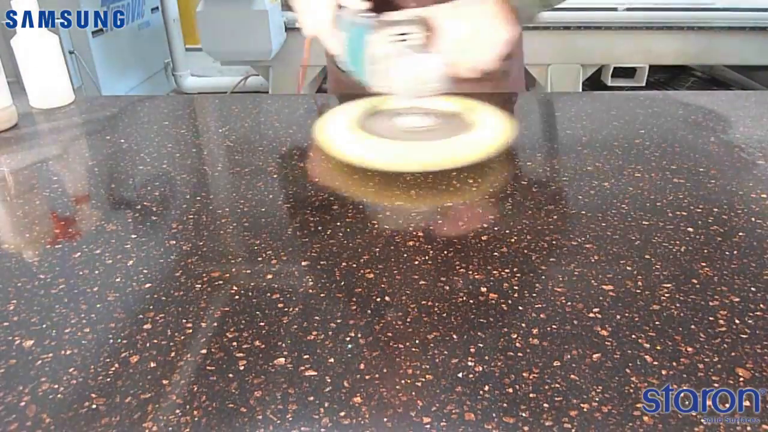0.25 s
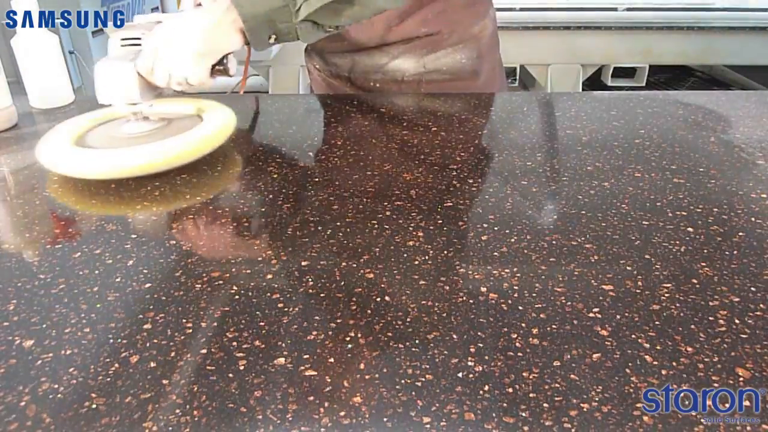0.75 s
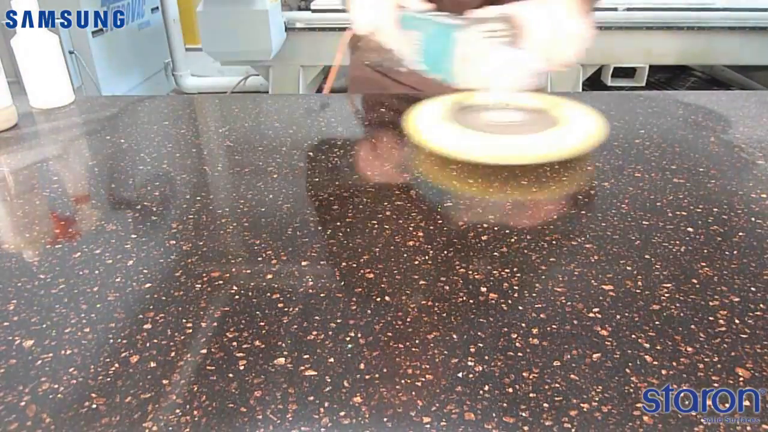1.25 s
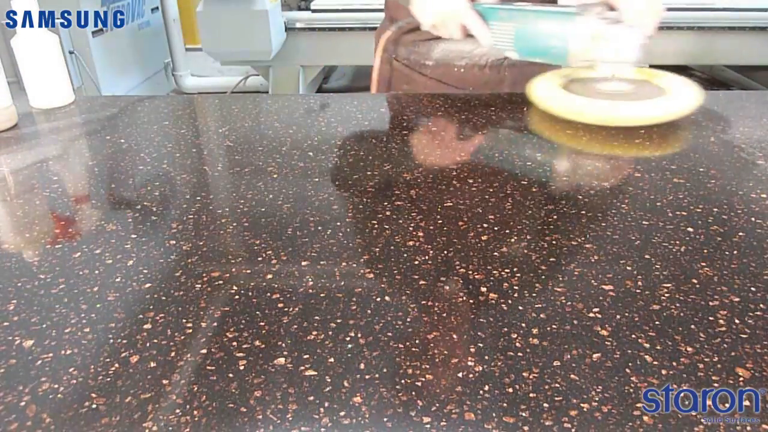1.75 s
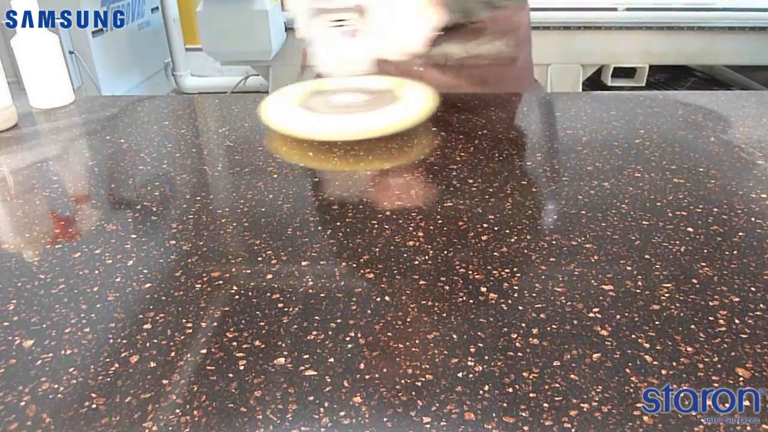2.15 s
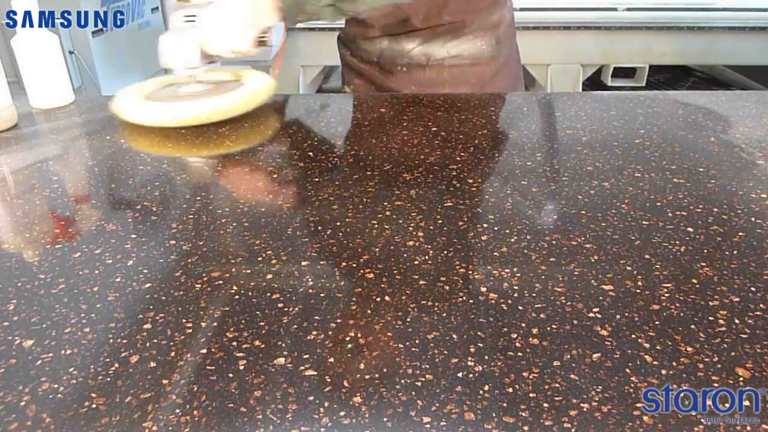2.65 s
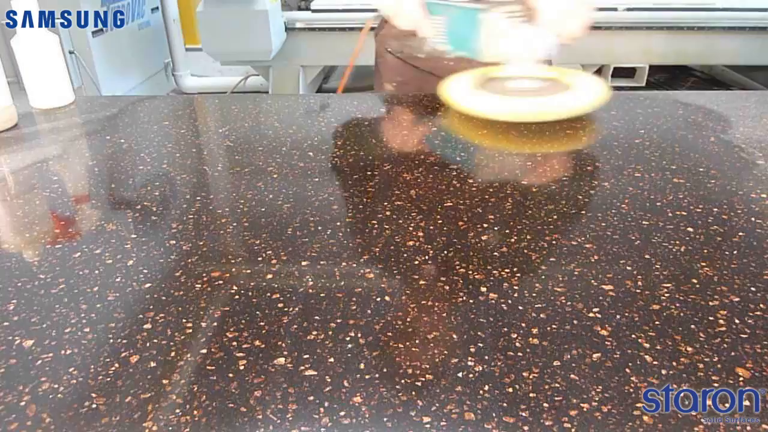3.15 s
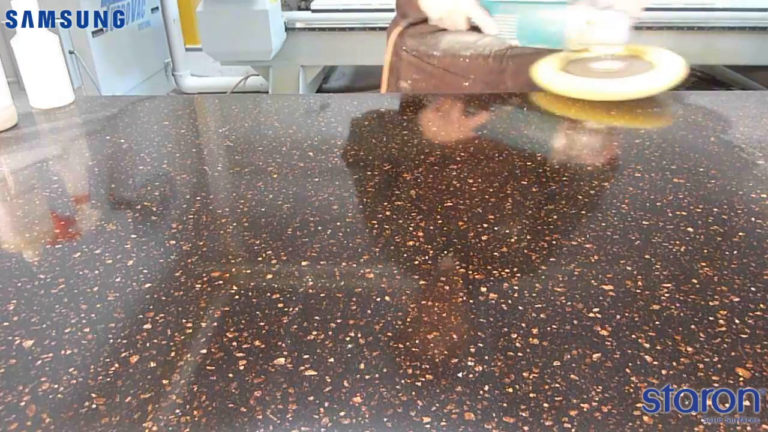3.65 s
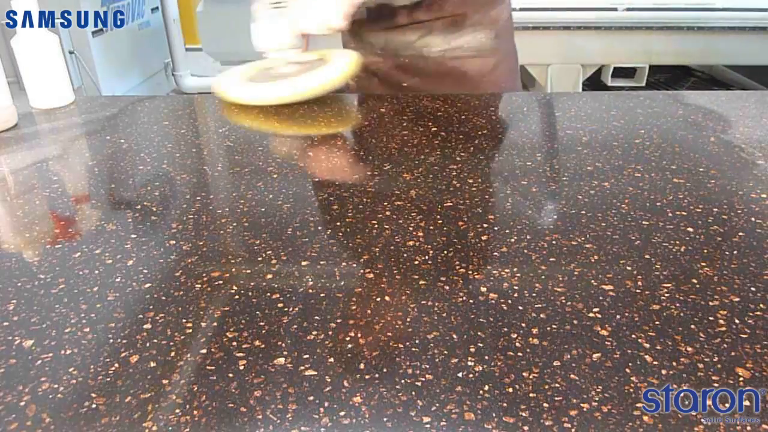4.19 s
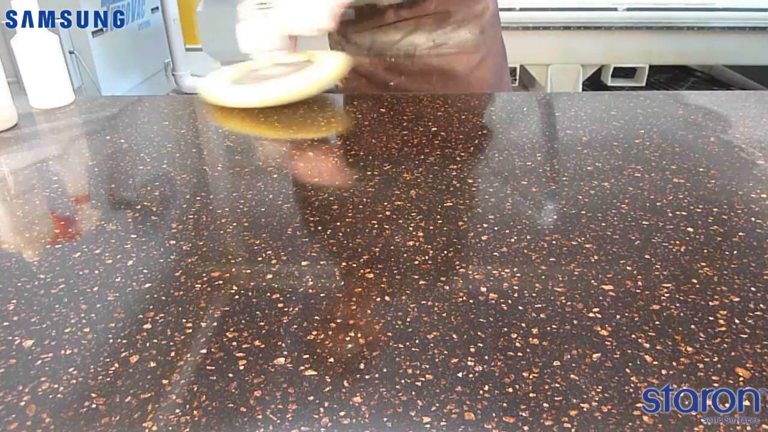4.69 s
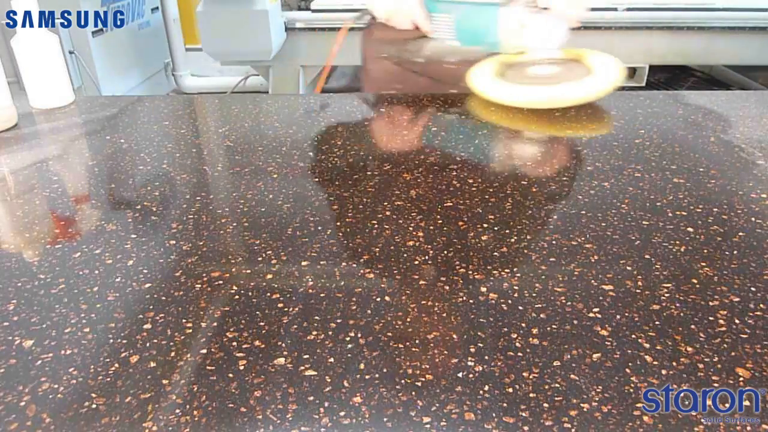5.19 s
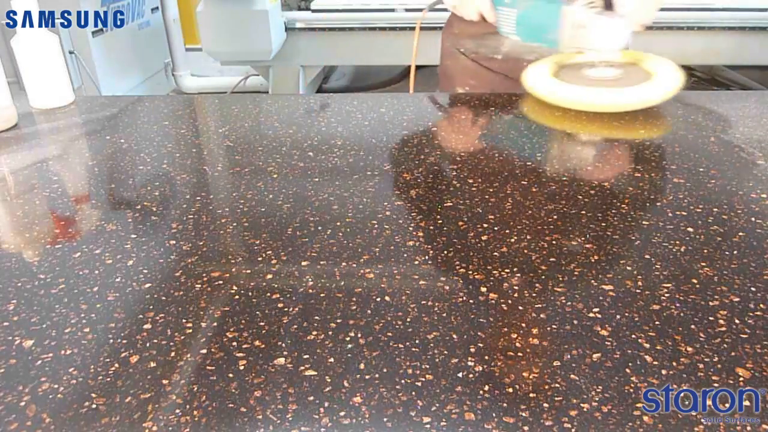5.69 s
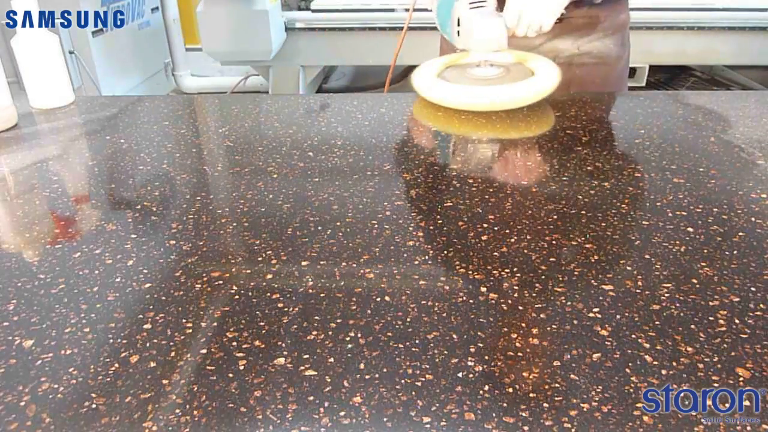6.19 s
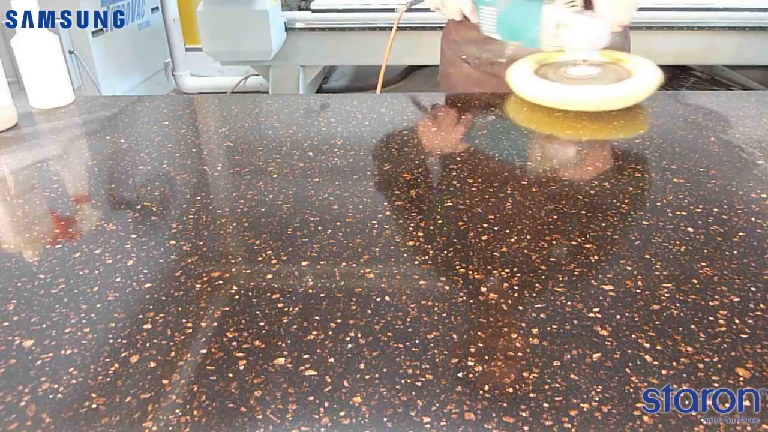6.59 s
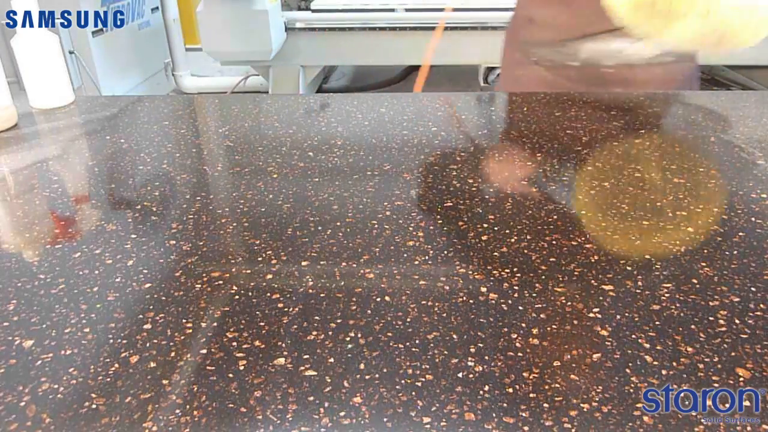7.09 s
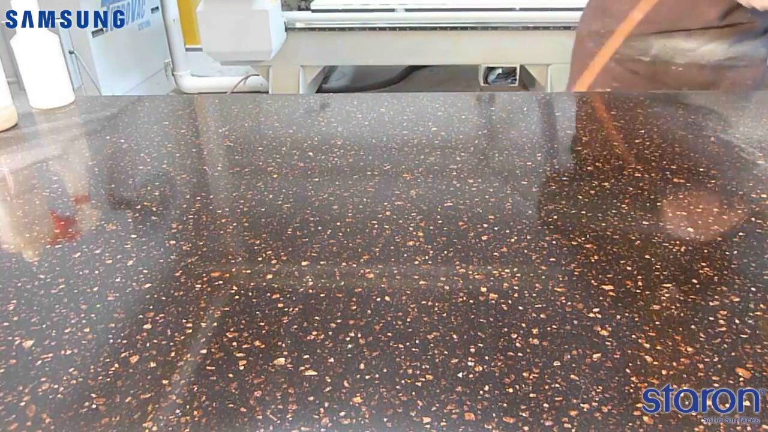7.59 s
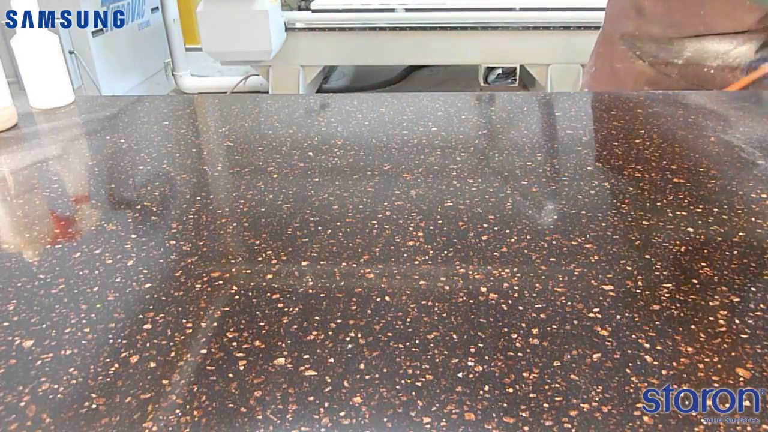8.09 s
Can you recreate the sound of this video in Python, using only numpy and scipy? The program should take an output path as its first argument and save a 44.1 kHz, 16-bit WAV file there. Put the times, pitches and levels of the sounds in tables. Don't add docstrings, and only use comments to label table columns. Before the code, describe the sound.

An electric polisher whines loudly and sweeps over a stone counter, then winds down with rattling gears, leaving a low blower hum and clicks.

```python
import sys
import numpy as np
from scipy import signal
from scipy.fft import rfft, irfft, next_fast_len
from scipy.io import wavfile
from scipy.ndimage import uniform_filter1d, map_coordinates

SR = 44100
rng = np.random.default_rng(int(sys.argv[2]) if len(sys.argv) > 2 else 0)


def gain_from_db(level_db):
    decades = np.asarray(level_db, float) / 20
    return 10 ** decades


def transcribe(signal):
    frames = np.atleast_2d(signal).T
    limited = np.clip(frames, -1, 1)
    pcm = np.round(limited * 32767).astype(np.int16)
    wavfile.write(sys.argv[1], SR, pcm)


N = 367794
T = np.arange(N) / SR
OFF_S, MAINS_HZ = 5.15, 60
PINION, CROWN = 6, 44
LEFT_RIGHT = np.array([[1], [-1]])

# (centre [Hz], width [Hz], gain [dB])
HOUSING = [(1130, 300, -2), (2360, 350, 18.5), (3576, 320, 14), (4690, 610, 15), (5600, 1000, 2)]
# (time [s], beat depth [0-1], rotor wobble [rad])
PLAY = [
    (5.15, .3, .03),
    (5.25, .8, .11),
    (5.42, 0.7, .11),
    (5.55, 0.3, 0.08),
    (5.65, .51, 0.046),
    (5.8, 0.2, .06),
    (5.95, 0.4, 0.047),
    (6.2, 0.4, 0.021),
    (6.5, 0.2, .02),
    (6.9, 0, 0.013),
]
# (time [s], level [dB])
PRESSURE = [
    (0, -59.5),
    (2.4, -64),
    (3.0, -56),
    (4.54, -44),
    (5.05, -50),
    (5.4, -54),
    (5.6, -47),
    (5.75, -60),
    (6.0, -59),
    (7.0, -69),
]


def curves(table):
    s, *columns = np.transpose(table)
    return [np.interp(T, s, c) for c in columns]


def unit(x):
    return x / np.sqrt(np.mean(np.abs(x) ** 2))


def colour(x, spectrum, modes=()):
    hz = np.arange(len(x) // 2 + 1) * SR / len(x) + 1
    outline_hz, outline_db = np.transpose(spectrum)
    db = np.interp(np.log(hz), np.log(outline_hz), outline_db)
    for centre_hz, width_hz, top_db in modes:
        db = db + top_db / (1 + (2 * (hz - centre_hz) / width_hz) ** 2)
    return irfft(gain_from_db(db) * rfft(x), len(x))


def noise(spectrum, modes=(), size=N):
    return unit(colour(rng.standard_normal(size), spectrum, modes))


def walk(rate_hz):
    k = max(int(SR / rate_hz), 2)
    held = np.repeat(rng.standard_normal(N // k + 1), k)
    return unit(uniform_filter1d(uniform_filter1d(held, k), k)[:N])


def patchy(spectrum, depth_db, rate_hz):
    size = next_fast_len(N)
    x = rfft(noise(spectrum, size=size))
    octave = np.log2(np.arange(len(x)) * SR / size + 1)
    out = 0
    for third in range(29, 40):
        band = irfft(x * np.clip(1 - 3 * np.abs(octave - third / 3), 0, 1), size)[:N]
        out = out + gain_from_db(depth_db * walk(rate_hz)) * band
    return out


def swells(table):
    spread_s = 0.045
    coarse = T[::64]
    bells = sum(gain_from_db(db) * np.exp(-.5 * ((coarse - s) / spread_s) ** 2) for s, db in table)
    return np.interp(T, coarse, bells)


def sweep():
    # (time [s], left minus right [dB])
    turning_points = [
        (0, -3),
        (0.781, 6.5),
        (1.62, -3.5),
        (2.6, 4.5),
        (3.62, -3.5),
        (4.54, 5),
        (5.48, -3),
        (6.1, -1),
        (7.0, -1),
    ]
    s, pan_db = np.transpose(turning_points)
    index = np.arange(len(s))
    stroke = np.interp(T, s, index)
    eased = np.floor(stroke) + .5 - .5 * np.cos(np.pi * (stroke % 1))
    return np.interp(eased, index, pan_db), np.sin(np.pi * (stroke % 1)) * (T < OFF_S)


def relative_pace():
    return uniform_filter1d(sweep()[1], SR // 5) - .6


def rotor():
    # (time [s], speed [turns/s])
    driven_speed = [(0, 250.5), (.6, 251), (.68, 253.5), (.88, 263.8), (1.0, 265.8), (1.25, 269),
                    (1.5, 269.1), (1.7, 272.8), (1.95, 272.8), (2.15, 271.3), (2.5, 272), (2.7, 274.3),
                    (2.95, 272.9), (3.4, 273.7), (3.65, 276.3), (3.95, 274.3), (4.4, 274.8), (4.6, 276.3),
                    (4.85, 274.5), (5.1, 275.9)]
    # (time [s], speed [turns/s])
    coasting_speed = [
        (5.17, 275),
        (5.25, 256.5),
        (5.4, 235.5),
        (5.55, 212.1),
        (5.75, 185.7),
        (6.25, 106.8),
        (6.42, 83.5),
        (6.6, 56),
        (6.881, 14),
        (7.1, 1.2),
    ]
    speed = curves(driven_speed + coasting_speed)[0]
    turns = np.cumsum(speed) / SR
    spindle = (turns - turns[int(OFF_S * SR)]) * PINION / CROWN
    power = np.clip((OFF_S - T) / 0.01, 0, 1)
    return speed, turns, spindle, power


def pad_load(power):
    return power * np.clip((T - 1.0) / 0.59, 0, 1)


def sag(speed, slope_db, knee):
    full_speed = 275.
    return slope_db * np.log2((speed + knee) / (full_speed + knee))


def hiss_level_db(speed):
    return -36 + sag(speed, 7.5, 14) + 2 * relative_pace()


def tooth_errors(spindle, renew_hz):
    field = rng.standard_normal((2, 100, CROWN))
    harmonic = np.arange(CROWN // 2 + 1)
    field = irfft(rfft(field) * (harmonic > 0) / (1 + (harmonic / 3.17) ** 2), CROWN)
    where = [T * renew_hz, spindle % 1 * CROWN]
    re, im = (map_coordinates(f, where, order=1, mode="grid-wrap") for f in field)
    return unit(re + 1j * im)


def rings_db(hz):
    # (centre [Hz], width [Hz], gain [dB])
    housing_rings = [(495, 110, 15), (1327, 430, 13), (1980, 320, 10.5), (2330, 190, 14), (2950, 610, 12),
                     (3640, 400, 11.5), (4700, 720, 19.5)]
    grid_hz = np.arange(0, 12000, 10.)
    gain_db = sum(db / (1 + (2 * (grid_hz - centre) / width_hz) ** 2) for centre, width_hz, db in housing_rings)
    return np.interp(hz, grid_hz, gain_db)


def whine_db(speed, power):
    # (multiple of rotor speed, driven [dB], load gain [dB], coasting [dB], loss per halving of speed [dB])
    main_lines = [
        (6, -44, 2, -42, 10.5),
        (8.96, -43.5, 2, -52.5, 11),
        (11.9, -36.5, 1, -41.5, 9.5),
        (18.2, -45.5, -3.5, -52.5, 6.5),
        (23.7, -46.5, -8, -51.5, 8),
    ]
    # (time [s], multiple of rotor speed, level [dB])
    further_swells = [(5.9, 9, -43), (5.72, 6, -31), (5.63, 12, -34), (5.92, 12, -34), (6.05, 18, -37),
                      (.4, 24, -40), (5.66, 24, -35), (5.1, 12, -47), (5.93, 6, -39), (6.4, 6, -41),
                      (6.5, 6, -50), (5.9, 9, -43), (6.21, 12, -43), (6.36, 12, -45), (6.06, 12, -40),
                      (5.5, 24, -41), (6.28, 24, -53), (5.3, 18, -42), (4.9, 12, -38)]
    # (time [s], level [dB])
    mesh_swells = [(0.01, -32.5), (0.1, -39), (0.16, -46.5), (0.24, -33), (0.39, -34), (0.57, -32.5),
                   (0.64, -37), (0.93, -47.5), (1.02, -30.5), (1.14, -47), (1.21, -31), (1.39, -45),
                   (1.48, -48), (1.56, -37.5), (2.01, -31.5), (2.23, -45), (2.3, -41.5), (2.38, -33.5),
                   (2.73, -33), (2.82, -30.0), (2.92, -28.5), (3.1, -44.5), (3.19, -28.5), (3.28, -39),
                   (3.42, -36), (3.51, -31.5), (3.63, -33.5), (3.77, -40), (3.89, -37.5), (4.04, -37.5),
                   (4.14, -39.0), (4.25, -34), (4.46, -40), (4.53, -29.5), (4.9, -32.5), (4.99, -39),
                   (5.13, -39)]
    # (time [s], level [dB])
    blade_swells = [(0.0, -35), (0.31, -44.5), (0.47, -43), (0.75, -45.0), (0.94, -41), (1.23, -39.0),
                    (1.4, -44), (1.51, -46.5), (1.57, -41.5), (1.88, -42), (2.08, -36), (2.22, -41),
                    (2.35, -30), (2.5, -36.5), (2.59, -40.5), (2.7, -38.5), (2.94, -40), (3.13, -41),
                    (3.28, -47), (3.47, -39), (3.68, -40.5), (3.87, -37), (4.0, -33.5), (4.13, -47.5),
                    (4.24, -33.5), (4.36, -43), (4.44, -33), (4.6, -47), (4.68, -33.5), (4.79, -30.5),
                    (4.92, -43), (5.06, -38), (5.14, -50)]
    # (time [s], level [dB])
    slot_swells = [(0.0, -38), (0.15, -39), (0.32, -38.5), (0.53, -33.5), (0.67, -27.5), (0.75, -30.5),
                   (0.82, -29.5), (0.88, -39.5), (0.94, -30.5), (1.02, -32.5), (1.12, -32.0), (1.21, -40.5),
                   (1.47, -29.5), (1.71, -42), (1.91, -36.5), (2.17, -37), (2.27, -28), (2.38, -38),
                   (2.49, -31), (2.68, -37), (2.79, -36.5), (2.849, -37), (2.96, -31), (3.07, -43),
                   (3.51, -35.0), (4.09, -33.5), (4.198, -30.5), (4.35, -31), (4.58, -32), (4.68, -32),
                   (4.81, -42), (4.89, -30.5)]
    # (time [s], level [dB])
    third_swells = [(0.0, -49.0), (0.06, -32.0), (0.13, -51.0), (0.24, -38), (0.36, -33), (0.45, -40.5),
                    (0.53, -43), (0.69, -40), (0.81, -41.5), (0.95, -32.5), (1.01, -47.0), (1.09, -36.0),
                    (1.29, -34), (1.38, -36), (1.5, -31), (1.64, -36), (1.73, -38.5), (1.86, -32.5),
                    (2.01, -50.5), (2.09, -49.5), (2.2, -41.5), (2.28, -41), (2.429, -39.5), (2.62, -48),
                    (2.9, -48), (2.98, -37.5), (3.06, -42.0), (3.13, -40), (3.25, -43), (3.65, -35.5),
                    (4.27, -45.5), (4.44, -46), (4.88, -37)]
    load = np.clip((T - .3) / 4.7, 0, 1)
    own_swells = (mesh_swells, blade_swells, slot_swells, third_swells, [])
    out = []
    for (order, driven_db, load_db, coast_db, slope_db), own in zip(main_lines, own_swells):
        further = [(s, db) for s, k, db in further_swells if round(k) == round(order)]
        swell = swells(list(own) + further)
        driven = gain_from_db(driven_db + load_db * load + walk(12))
        free = gain_from_db(coast_db + rings_db(order * speed) + sag(speed, slope_db, 12.0))
        out.append(20 * np.log10(power * driven + (1 - power) * free + swell))
    return out


def slot_ripple(turns, power):
    # (time [s], level [dB])
    above_swells = [(0.01, -33.5), (0.111, -34), (0.24, -42), (0.59, -39), (0.69, -43.5), (1.41, -37),
                    (1.54, -45), (1.63, -38.0), (1.739, -38.5), (1.92, -40.5), (2.01, -44), (2.55, -39),
                    (2.68, -43.5), (2.82, -45), (3.04, -39), (3.21, -47), (3.31, -39), (3.5, -36),
                    (3.6, -42), (3.72, -36), (4.51, -36.5), (4.62, -47.0)]
    # (time [s], level [dB])
    below_swells = [(0.0, -38), (0.36, -34), (0.69, -42), (0.77, -41), (0.89, -35.5), (1.11, -39),
                    (1.38, -42.0), (1.49, -38.5), (1.62, -34), (1.73, -33.5), (1.87, -34), (2.21, -41),
                    (2.32, -38.5), (2.51, -39.5), (2.64, -37.5), (3.06, -39.0), (3.38, -38), (3.52, -33.5),
                    (3.69, -36), (4.32, -40.0), (4.73, -40.0), (4.92, -43)]
    ripple = np.exp(2j * np.pi * 2 * MAINS_HZ * T)
    out = 0
    for shift, db, table in ((ripple, -44.5, above_swells), (1 / ripple, -42, below_swells)):
        tone = np.real(shift * np.exp(2j * np.pi * 12 * turns + .3j * walk(45)))
        out = out + np.sqrt(2) * power * (gain_from_db(db) + swells(table)) * tone
    return out


def rotor_whine(throb):
    # (multiple of rotor speed, level [dB])
    weak_lines = [(2, -11.5), (4, -17), (5, -19), (11, -14.5), (13, -12), (15, -13), (16, -18), (21, -18.5)]
    # (multiple of rotor speed, level [dB])
    freed_lines = [(3, -54.5), (15, -58), (16, -53), (21, -50), (22, -52), (27, -59.5), (30, -60.5),
                   (32, -63), (36, -68)]
    # (time [s], level [dB])
    pad_chatter = [
        (4.27, -45),
        (4.36, -41),
    ]
    speed, turns, spindle, power = rotor()
    base_db = hiss_level_db(speed) - 2.0
    load = pad_load(power)
    high_throb = throb ** 0.3
    ripple = np.exp(2j * np.pi * 2 * MAINS_HZ * T)
    wobble_rad = (1 - power) * curves(PLAY)[1] * np.sin(2 * np.pi * spindle)
    wobble_rad = wobble_rad + (1.3 - power) * .05 * walk(90)

    def cosine(order, phase_turns=0.):
        return np.cos(2 * np.pi * (order * turns + phase_turns))

    def line(order, db, teeth_db, mains=0., renew_hz=6.):
        teeth = gain_from_db(base_db + teeth_db + 1.5 * (2.0 - power)) * tooth_errors(spindle, renew_hz)
        sidebands = 1.36 / ripple + .9j * ripple + .5 / ripple ** 2 - 0.2 * ripple ** 2
        torque = 1 + power * mains * sidebands
        flutter = 1 + (.8 - .1 * power) * (.2 * walk(60) + .33j * walk(45))
        tone = gain_from_db(db - 0.15 * power) * torque * flutter * np.exp(-1j * order * wobble_rad)
        return np.sqrt(2) * np.real((tone + teeth) * np.exp(2j * np.pi * order * turns))

    mesh_db, blade_db, slot_db, third_db, fourth_db = whine_db(speed, power)
    lines = line(6, mesh_db, -0.64, mains=0.16)
    lines += line(9, blade_db, 0.45, mains=.03)
    lines += line(12, slot_db - 0.3 * power, 0.5, mains=0.067)
    lines += slot_ripple(turns, power)
    lines += (line(18, third_db, -0.42, mains=0.3) + line(24, fourth_db, -15.0)) * high_throb
    lines += line(3, base_db - 19.5 + 13 * load + 2.5 * walk(7), -15 + 5 * load, renew_hz=11.)
    lines += swells(pad_chatter) * cosine(1.5)
    for order, db in freed_lines:
        freed_db = db + rings_db(order * speed) + sag(speed, 4.5, 11.)
        lines += (1 - power) * gain_from_db(freed_db) * cosine(order) * high_throb
    for order, db in weak_lines:
        radiated = np.tanh(order * speed / 500) ** 2
        lines += gain_from_db(base_db + 11.0 + db + 2.2 * walk(8)) * radiated * cosine(order, rng.random())
    early_coast = (1 - power) * np.clip((speed - 165) / 30, 0, 1)
    lines += early_coast * gain_from_db(-38.5 + 2 * walk(30)) * cosine(4)
    return lines


def brush_hiss(throb):
    # (frequency [Hz], level [dB per Hz])
    hiss_colour = [(900, -17.5), (1200, 1), (2000, 3), (3000, 2.5), (4000, 3.5), (5500, -0.5), (6600, -3),
                   (7100, -9), (7700, -32.5)]
    speed, turns, _, power = rotor()
    mains = np.cos(2 * np.pi * 2 * MAINS_HZ * T)
    sparks = 1 + 0.04 * power * mains + 0.091 * np.cos(2 * np.pi * turns)
    gain = gain_from_db(hiss_level_db(speed) + 8) * (.5 + .5 * power)
    return gain * sparks * throb ** .2 * patchy(hiss_colour, depth_db=1.5, rate_hz=8.)


def pad_rush():
    # (frequency [Hz], level [dB per Hz])
    rush_colour = [(25, -28), (60, -15.5), (150, -7), (300, 2), (500, 0.5), (820, 9), (1000, 3),
                   (1300, -39)]
    speed, _, _, power = rotor()
    rush_db = -38 + sag(speed, 11, 60) - 1.5 * relative_pace()
    weight_db = 0.23 * (curves(PRESSURE)[0] + 56) * power
    return gain_from_db(rush_db + walk(12) + weight_db) * noise(rush_colour)


def pad_drum():
    speed, turns, spindle, power = rotor()
    slap = gain_from_db(curves(PRESSURE)[0] + walk(8.8))
    drum = 1.1 * np.cos(2 * np.pi * 3 * spindle) + .25 * np.cos(2 * np.pi * 2 * spindle)
    unbalance = slap + pad_load(power) * gain_from_db(hiss_level_db(speed) - 13.5)
    force = np.clip(speed / 250, 0, 1) ** 3
    return force * (slap * drum + unbalance * np.cos(2 * np.pi * turns))


def loose_teeth(throb):
    speed, turns, _, power = rotor()
    ticks = 0
    for k in range(PINION, 20):
        tone = np.cos(2 * np.pi * (k * PINION * turns + rng.random()))
        below_9_khz = np.clip(9 - k * PINION * speed / 1000, 0, 1)
        ticks = ticks + gain_from_db(4.1 * walk(10)) * tone * below_9_khz / k ** 0.38
    ticks = colour(ticks, [(900, -27), (1500, -19.5), (6000, -9.0), (7500, -32.5)],
                   [(hz, 1.3 * width_hz, 0.7 * db) for hz, width_hz, db in HOUSING])
    rattle = noise([(700, -13.5), (1300, 5.0), (2350, -7), (3300, -8.0), (6500, -0.5), (7600, -22.0)],
                   [(hz, 1.7 * width_hz, 0.8 * db) for hz, width_hz, db in HOUSING])
    tick_db = -35.5 + sag(speed, 4.5, 15)
    rattle_db = -30 + 20 * np.log10(np.tanh(speed / 81)) + 1.2 * walk(30)
    return (1 - power) * (gain_from_db(tick_db) * throb * ticks + gain_from_db(rattle_db) * throb ** .15 * rattle)


def polisher():
    _, _, spindle, power = rotor()
    beat = curves(PLAY)[0] * gain_from_db(.5 * walk(25))
    knock = np.cos(2 * np.pi * spindle) + 0.41 * np.sin(2 * 2 * np.pi * spindle)
    throb = np.exp((0.18 * power + (1 - power) * beat) * knock)
    whine = throb ** (1.35 - .55 * power) * rotor_whine(throb) / (1 + 0.8 * (1 - power) * beat)
    loose = throb ** 0.18 * loose_teeth(throb)
    stopping = np.clip((7.15 - T) / 0.25, 0, 1)
    return stopping * (whine + loose + brush_hiss(throb) + pad_rush() + pad_drum())


def blower():
    # (multiple of shaft speed, level [dB])
    shaft_lines = [(1, -41), (2, -31), (3, -29.5), (4, -22), (5, -8), (6, 2), (7, -27.5), (8, -15.5),
                   (9, -15.5), (10, -9), (11, -23), (12, -10.5), (13, -11), (14, -15), (15, -52.5),
                   (16, -29.5), (17, -19.5), (18, -16.5), (19, -15), (20, -18), (21, -34.5), (22, -30),
                   (23, -16), (24, -17), (25, -16), (26, -14), (27, -23), (28, -31), (29, -26.5),
                   (30, -27.5),
                   (32, -22), (36, -24), (42, -31), (48, -32), (54, -30), (60, -29), (78, -34.5), (84, -34),
                  (90, -50.5), (120, -39)]
    # (frequency [Hz], level [dB per Hz])
    air_colour = [(24, -70.5), (40, -36.5), (92, -21), (177, -8), (225, -16.5), (381, -16), (629, -19.5),
                  (800, -22), (1200, -28.5), (2670, -36.5), (6300, -38), (7000, -45.5), (7450, -53.5),
                  (7800, -71.5)]
    shaft_hz, held_db, free_db, recover_s, recover_db_per_s = 29.53, -44.5, -32, 5.32, 6.5
    turns = shaft_hz * T + 0.0049 * walk(2)
    hum = 0
    for k, db in shaft_lines:
        hum = hum + gain_from_db(db + 1.4 * walk(4)) * np.cos(2 * np.pi * (k * turns + rng.random()))
    hum = hum * gain_from_db(0.23 * walk(22))
    air = gain_from_db(-5.5 + 0.36 * walk(9.7)) * noise(air_colour) * (1 + 0.1 * np.cos(2 * np.pi * turns))
    wide = gain_from_db(-18) * noise([(30, -22.0), (170, -4.0), (260, -11.5), (900, -7.5), (2000, -14.0),
                             (6500, -19.0), (7900, -45.5)])
    gain_db = np.clip(held_db + recover_db_per_s * (T - recover_s), held_db, free_db)
    gain_db = uniform_filter1d(gain_db, SR // 3) + 0.5 * walk(2.7) * (T < OFF_S)
    return gain_from_db(gain_db) * (np.sqrt(2) * hum + air + wide * LEFT_RIGHT)


def put_down_clicks():
    # (time [s], level [dB], ring [Hz], t60 [s], upper ring [dB], snap [dB])
    taps = [
        (7.1555, -30.5, 2520, 0.015, -33, -18),
        (7.1854, -33, 2330, 0.027, -19, -20),
        (7.213, -31, 3870, 0.043, -1, -5),
        (7.2982, -35.5, 2200, 0.016, -12, -2),
        (7.311, -40, 1500, .01, -16, -9),
        (7.3225, -45.5, 3300, .008, 2, 1.5),
    ]
    out = np.zeros((2, N))
    lead, snap_t60_s, pan_db = 512, .004, -4
    age_s = (np.arange(4096) - lead) / SR
    for s, db, hz, t60_s, upper_db, snap_db in taps:
        crack = rng.standard_normal(len(age_s)) * gain_from_db(-60 * np.abs(age_s) / t60_s) * (age_s >= 0)
        ring = colour(crack, [(900, -21.0), (1600, -11.5), (6000, -23.5), (7500, -43.5)],
                      [(hz, 800, 17), (5200, 900, 19 + upper_db)])
        snap = colour(crack * gain_from_db(-60 * np.abs(age_s) / snap_t60_s),
                      [(900, -21), (1800, 1.5), (5500, 1), (7200, -23.5)])
        click = ring / np.abs(ring).max() + gain_from_db(snap_db) * snap / np.abs(snap).max()
        start = int(s * SR) - lead
        out[:, start:start + len(age_s)] += click * gain_from_db(db + pan_db * LEFT_RIGHT / 2)
    return out


def cord_drag():
    # (time [s], peak [dB], rise [dB/s], fall [dB/s])
    cord_brushes = [
        (7.35, -60, 86, 189),
        (7.57, -45.5, 204, 27.5),
    ]
    drag = sum(gain_from_db(db + np.minimum(rise * (T - s), fall * (s - T))) for s, db, rise, fall in cord_brushes)
    drag = drag * gain_from_db(-170 * np.clip(T - 7.82, 0, 1))
    rustle = noise([(800, -19.0), (2000, -2.5), (4500, -1), (6500, -4.0), (7200, -18.5), (7900, -31.0)])
    return drag * gain_from_db(walk(25)) * rustle * np.array([[.9], [1.1]])


def workshop(x, t60_s, wet_db, wide_hz):
    size = SR
    age_s = np.arange(size) / SR
    fade = gain_from_db(-60 * age_s / t60_s) * (np.arange(size) > .004 * SR)
    mid = noise([(150, -21.0), (900, 3.5), (3000, 6.0), (8000, -19.5)], size=size) * fade
    side = noise([(30, -50), (wide_hz / 3, -24), (wide_hz / 1.4, -14), (wide_hz, -6), (3000, -3),
                  (8000, -6)], size=size) * fade
    scale = gain_from_db(wet_db) / np.sqrt(np.sum(mid ** 2))
    tails = [scale * (.22 * mid + sign * side) for sign in (1, -1)]
    return np.array([signal.fftconvolve(x, tail)[:N] for tail in tails])


def scene():
    tool = polisher()
    small = put_down_clicks() + cord_drag()
    treble = colour(tool, [(300, -28.5), (1000, -13.0), (1500, -9), (2500, -1.5), (6000, -0.5)])
    side = np.tanh(0.062 * sweep()[0]) * treble
    wet = workshop(tool + gain_from_db(-6) * small.mean(axis=0), t60_s=1.0, wet_db=-12, wide_hz=1500)
    return tool + side * LEFT_RIGHT + small + wet + blower()


def roll_off(x):
    return signal.sosfilt(signal.butter(12, 8020, fs=SR, output="sos"), x)


def record(dry):
    thin = signal.sosfilt(signal.butter(1, 45, "high", fs=SR, output="sos"), dry)
    cut = signal.sosfilt(signal.ellip(6, .5, 50, 7600, fs=SR, output="sos"), thin)
    return roll_off(cut)


dry = scene()
out = record(dry)
transcribe(out)
```